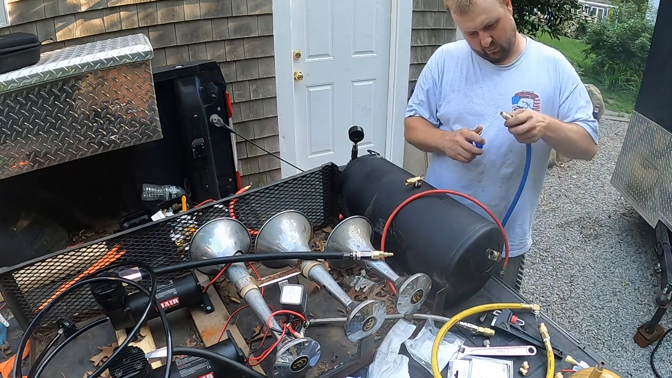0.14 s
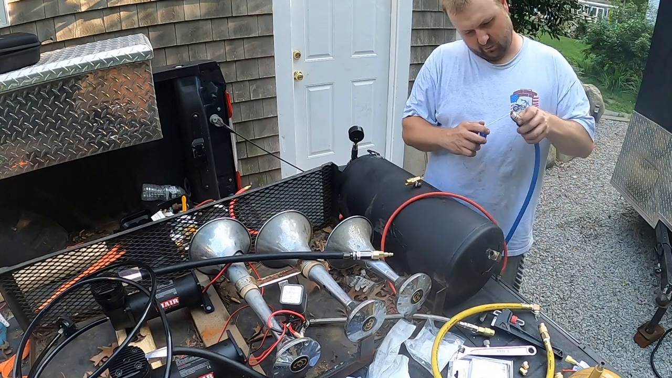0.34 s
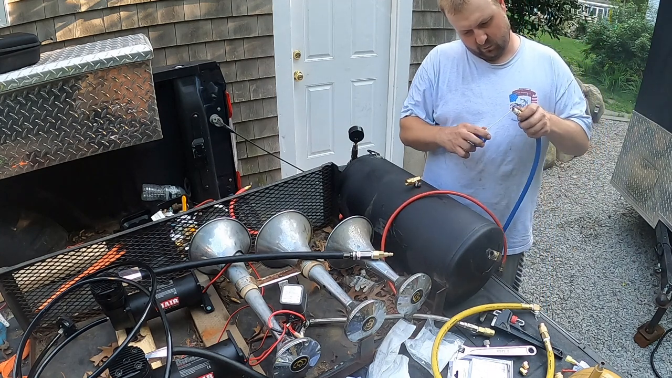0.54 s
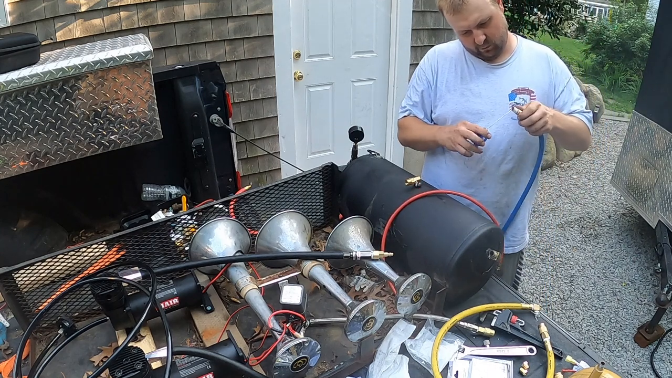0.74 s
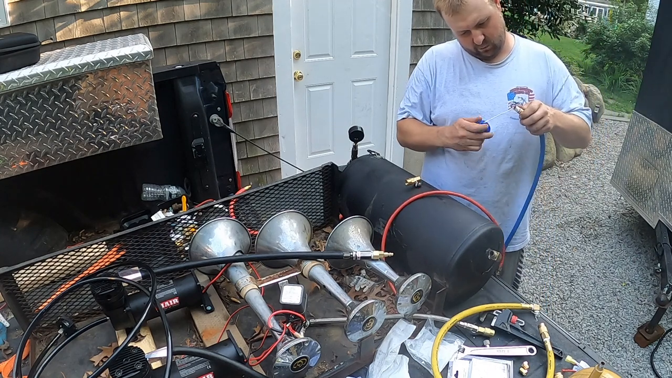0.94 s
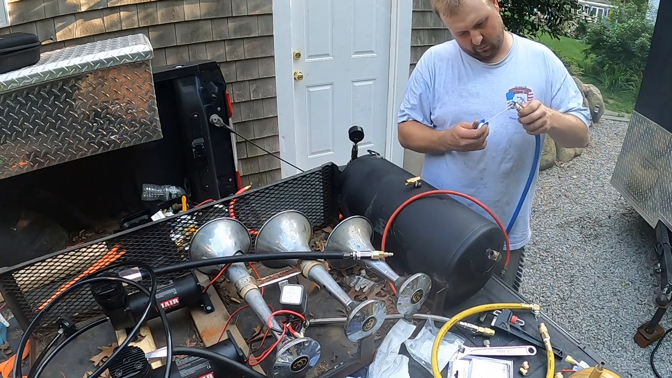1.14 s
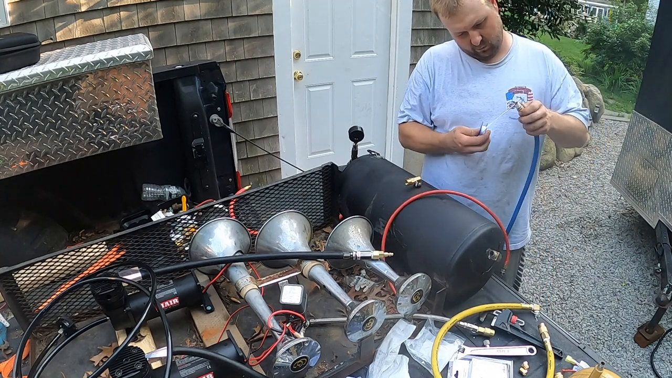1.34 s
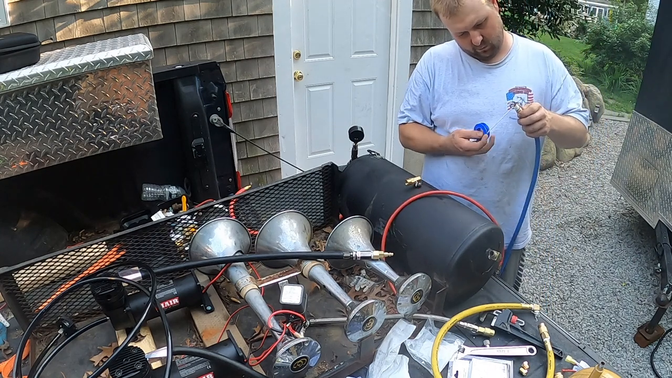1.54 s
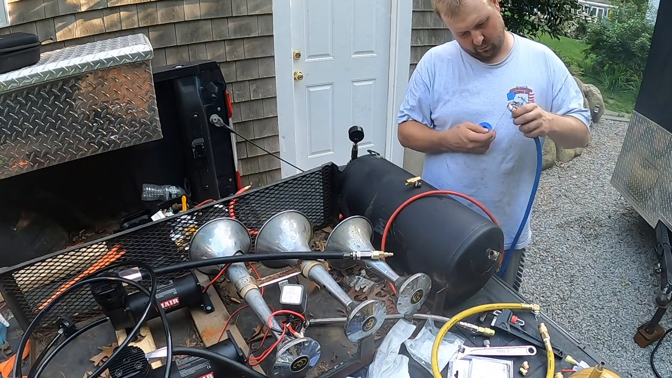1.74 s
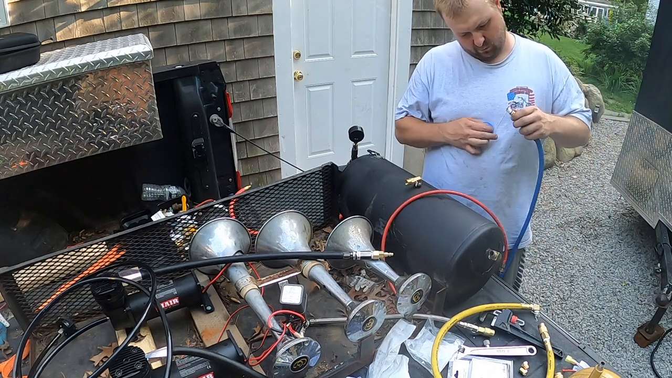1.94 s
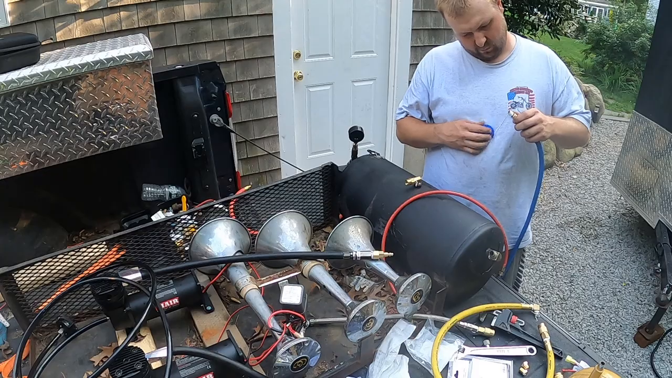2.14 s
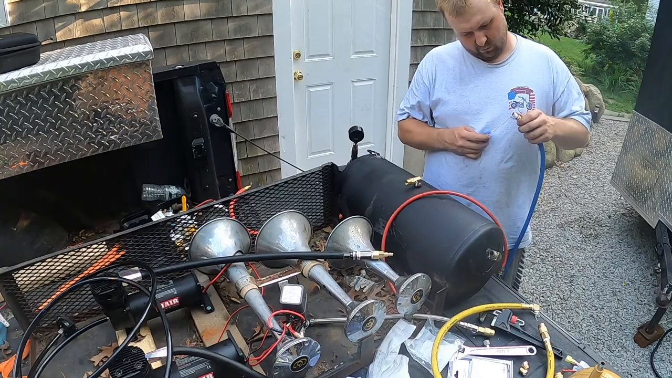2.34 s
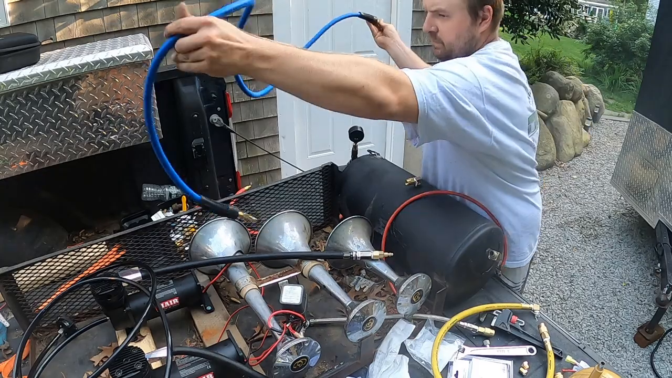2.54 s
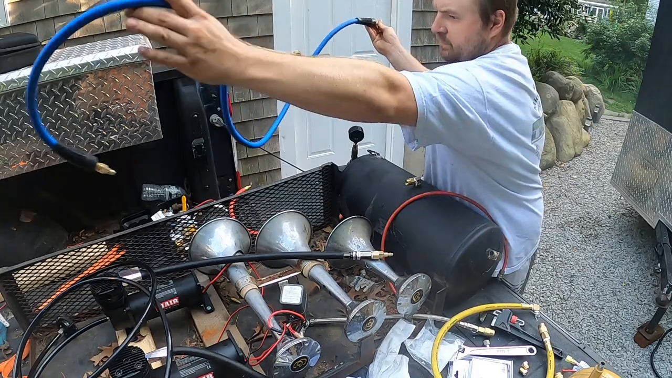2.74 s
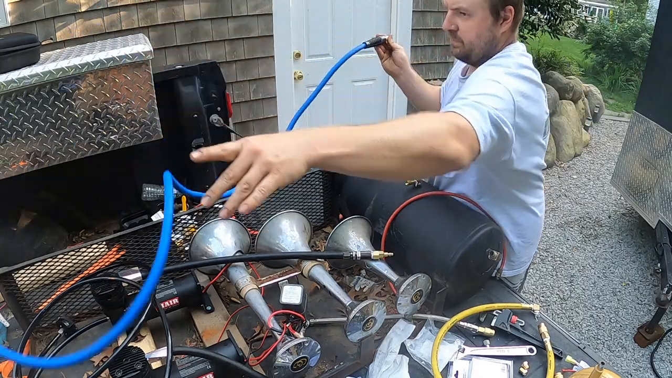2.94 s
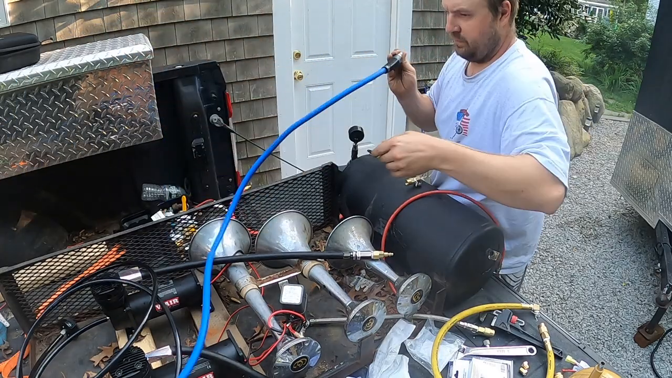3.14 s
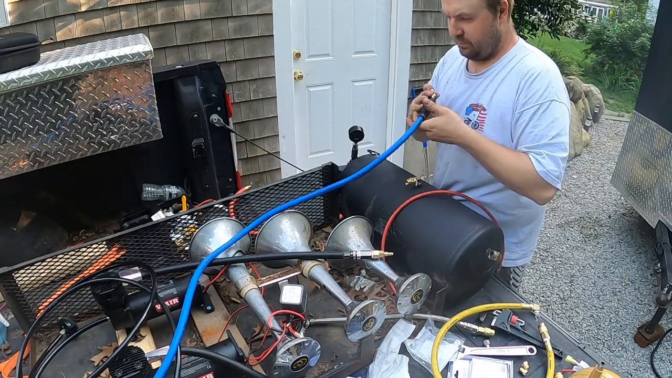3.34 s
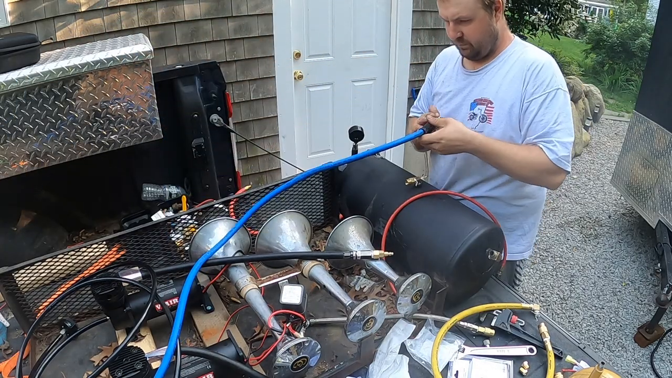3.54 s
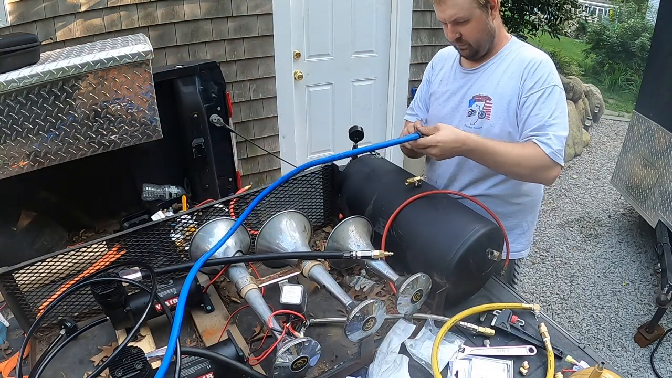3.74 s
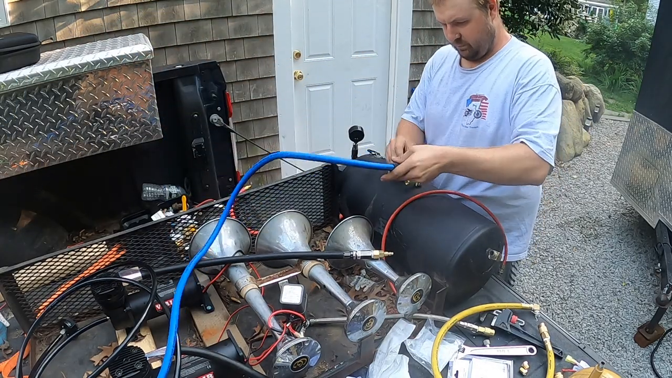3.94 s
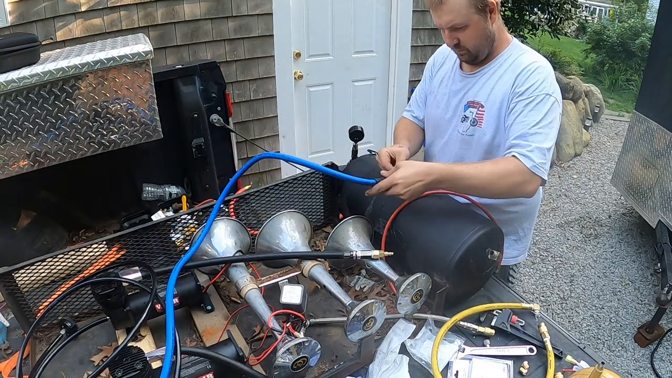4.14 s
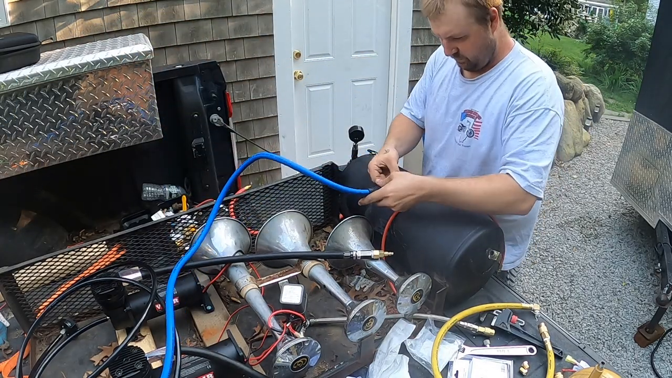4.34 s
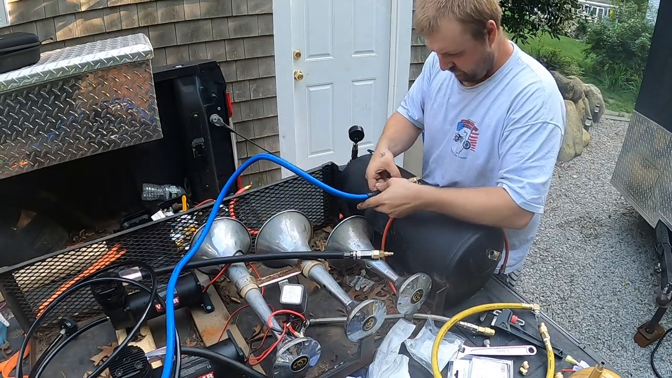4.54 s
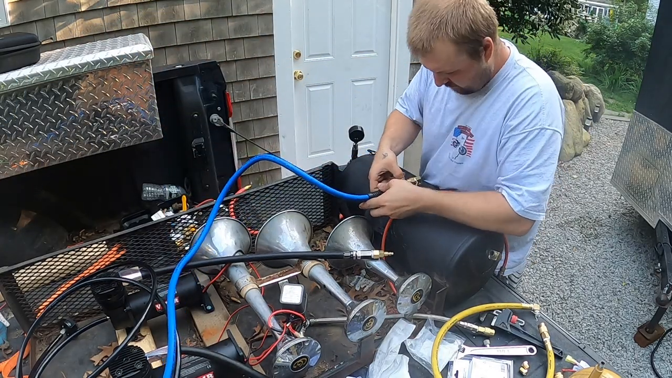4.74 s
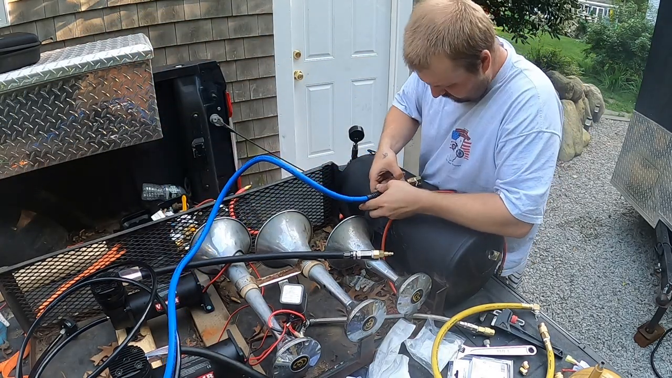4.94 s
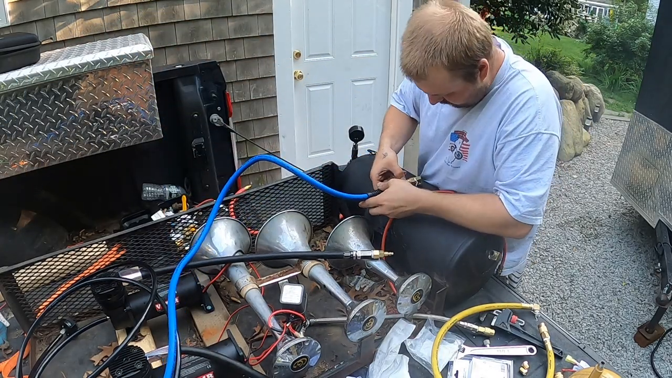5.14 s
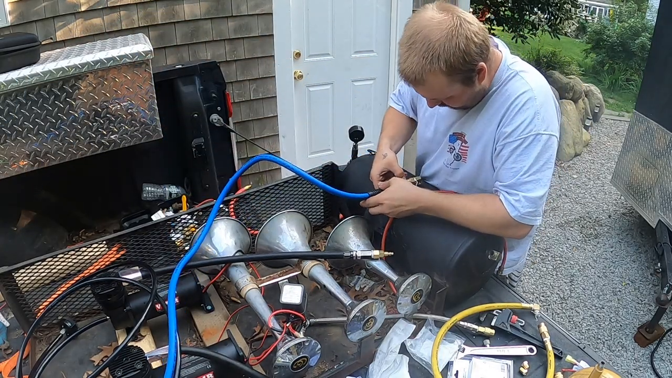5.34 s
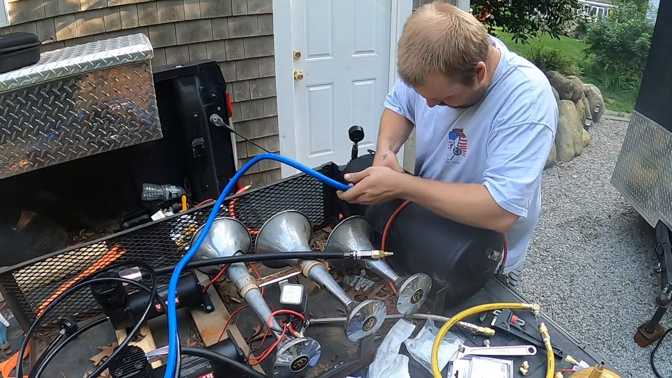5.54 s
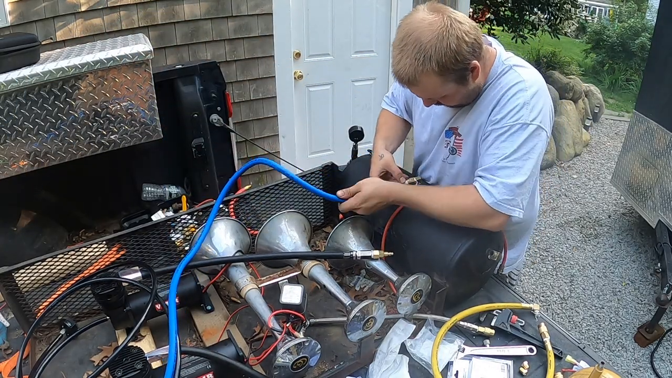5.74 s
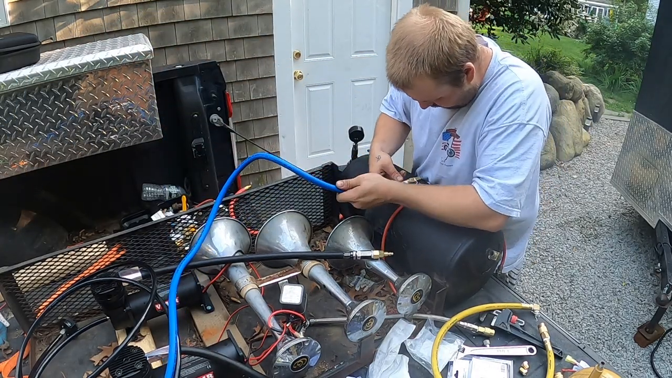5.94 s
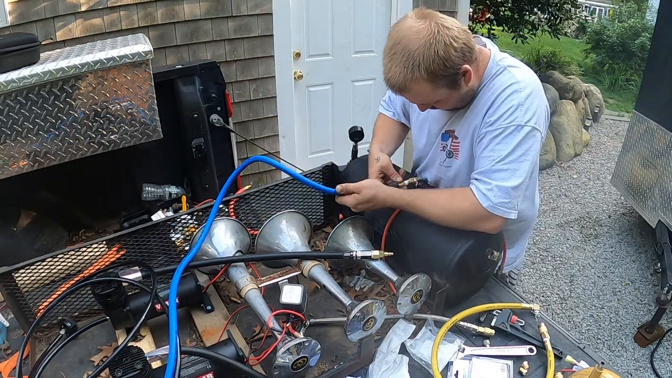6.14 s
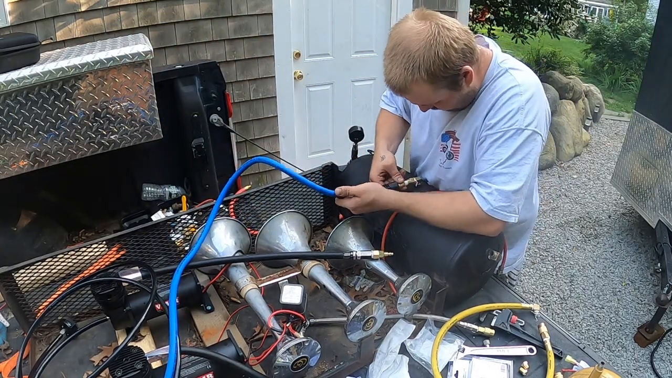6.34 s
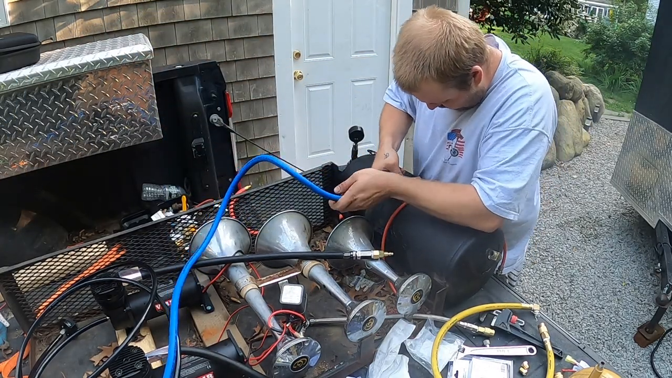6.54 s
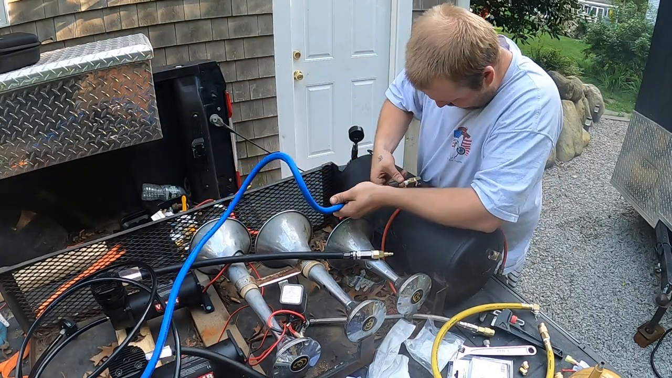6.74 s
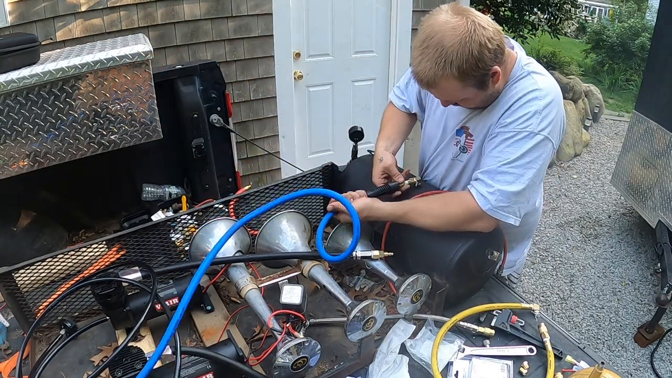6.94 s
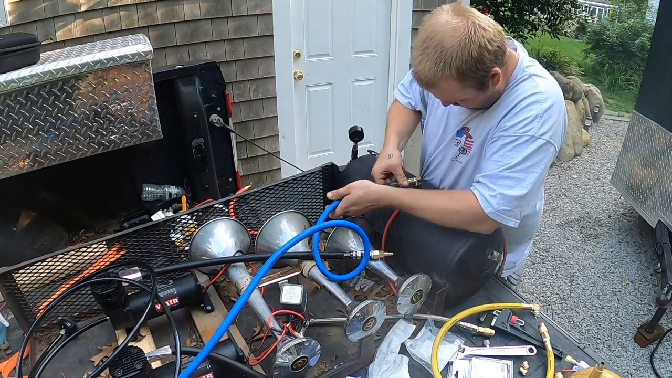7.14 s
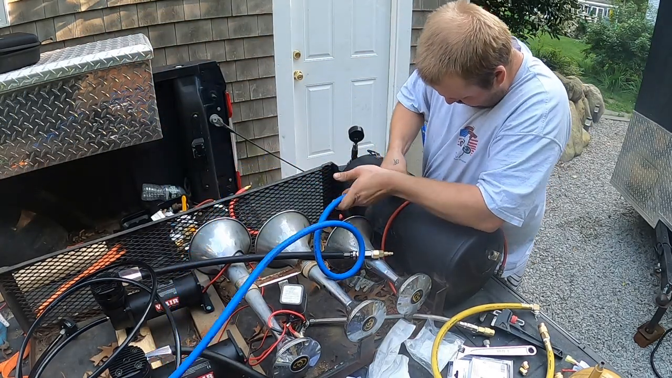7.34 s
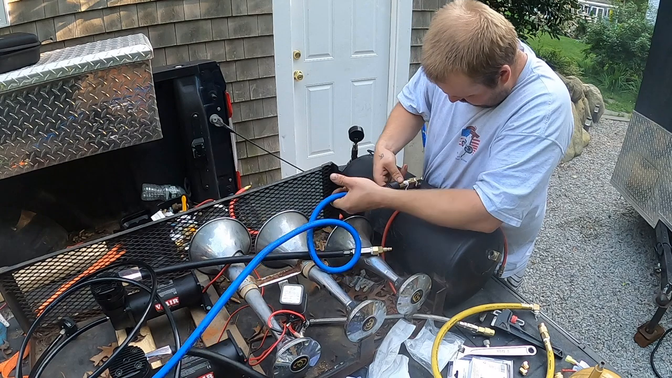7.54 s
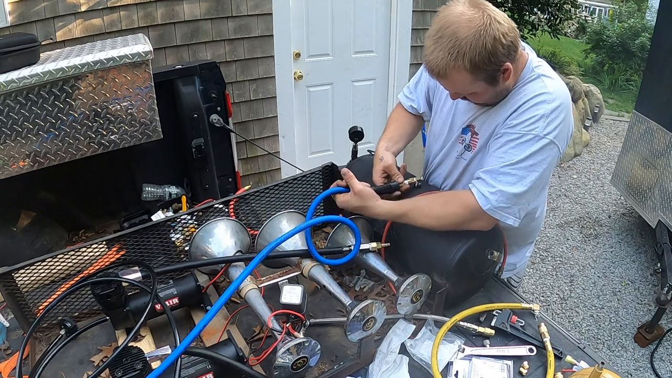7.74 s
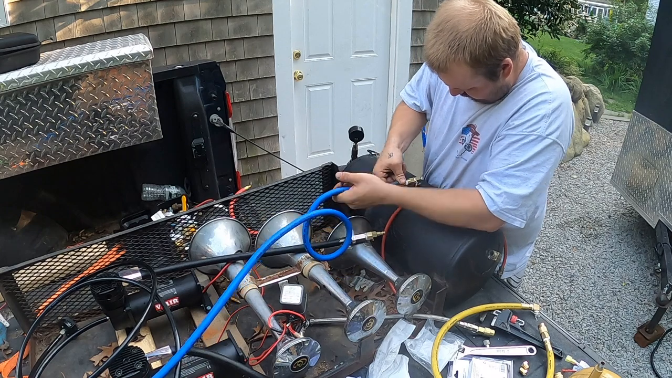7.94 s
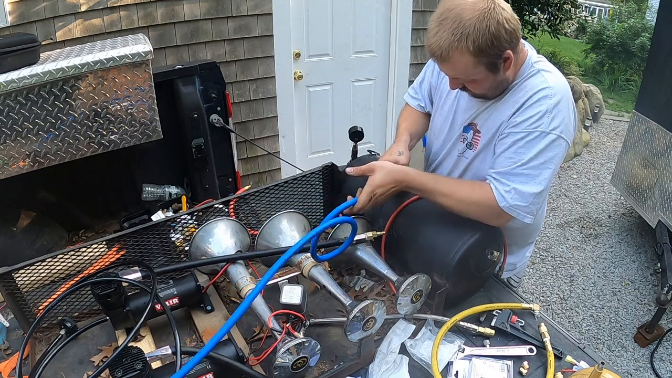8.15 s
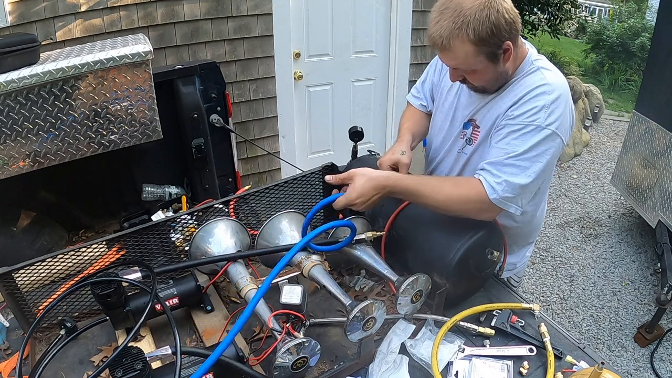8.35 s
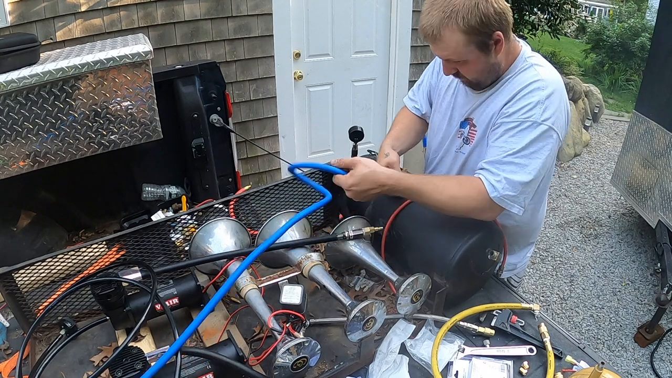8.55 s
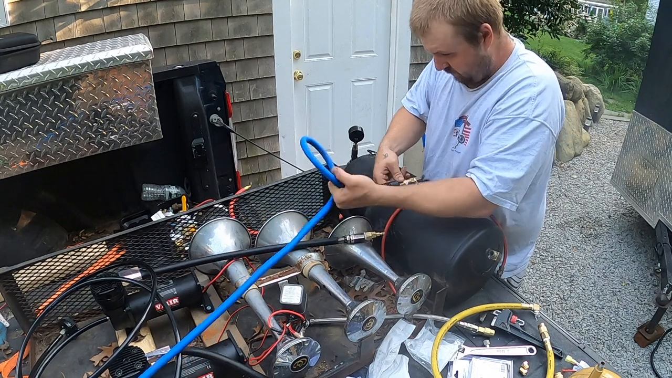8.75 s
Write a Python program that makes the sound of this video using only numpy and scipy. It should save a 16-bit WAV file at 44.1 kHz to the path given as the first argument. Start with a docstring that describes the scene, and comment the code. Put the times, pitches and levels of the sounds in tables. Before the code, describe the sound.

Sharp metal clicks, clanks and scrapes of an air hose being handled outdoors, with one loud thump and a fading low hum.

```python
"""In a yard, a hose with a brass coupler is handled over a trailer of steel horns, tools and an air tank.
Knocks make the metal ring, scrapes make the horns sing, and fingers brush the coupler.
The dropped hose end shakes the trailer and the microphone mount that rides on it.
Behind it are fading traffic, a breeze, insects, a far machine whine and two birds.
Two microphone openings, left and right, each hear the scene a little differently."""
import sys
import numpy as np
from scipy import signal
from scipy.fft import rfft, irfft
from scipy.io import wavfile
from scipy.ndimage import uniform_filter1d

SR = 44100
rng = np.random.default_rng(int(sys.argv[2]) if len(sys.argv) > 2 else 0)


def wav_out(sig):
    """Save sig, one row per channel (or a flat mono array), as 16-bit PCM at SR to the path in sys.argv[1]."""
    wavfile.write(sys.argv[1], SR, np.round(np.clip(np.atleast_2d(sig).T, -1, 1) * 32767).astype(np.int16))


N = 392490
T = np.arange(N) / SR
HZ = np.arange(N // 2 + 1) * SR / N + 1e-3
EDGE_DB = -1.5  # extra dip in the edge band, just below the treble

# Noise bands of a knock (thud, body, mid, edge, treble, top): low_hz, high_hz, fade_time_factor
CRACK_BANDS = [(150, 600, 1.5), (600, 1500, 1.2), (1500, 4200, 1), (4200, 6000, .85), (6000, 9500, .7),
               (9500, 14500, .6)]
# The bright bite of a knock: low_hz, high_hz, fade_time_factor
BITE_BAND = (2700, 4000, .8)
# How alike left and right are for background noise and rumble: pitch_hz, likeness (0 to 1)
FAR_LIKENESS = [(100, 0.93), (300, 0.66), (3500, 0.78), (5000, 0.98), (10000, 0)]


def gain(db):
    """Turn decibels into a multiplier."""
    return 10 ** (np.asarray(db, float) / 20)


def fade(t, fade_s):
    """Die away by 60 dB in fade_s seconds."""
    return np.exp(-np.log(1000) * t / fade_s)


def over_hz(table):
    """Read a (pitch_hz, value) table at every frequency."""
    hz, value = np.transpose(table)
    return np.interp(np.log(HZ), np.log(hz), value)


def over_time(table):
    """Read a (time_s, value) table at every sample."""
    return np.interp(T, *np.transpose(table))


def wander(rate_hz):
    """A smooth random wobble, roughly 1 in size."""
    hold = int(SR / rate_hz)
    steps = np.repeat(rng.standard_normal(N // hold + 1), hold)
    return 1.3 * uniform_filter1d(uniform_filter1d(steps, hold), hold)[:N]


def noise(colour, likeness):
    """Left and right noise; colour sets how strong each frequency is."""
    alike = np.clip(over_hz(likeness), 0, 1)
    shared, apart = rfft(rng.standard_normal((2, N))) * colour * np.sqrt([1 + alike, 1 - alike])
    pair = irfft([shared + apart, shared - apart], N)
    return pair / np.std(pair.mean(axis=0))


def noise_bands():
    """The noise that handling sounds are made of: six crack bands, the bite and a deep rubbing band."""
    # How alike left and right are up close: pitch_hz, likeness (0 to 1)
    likeness = [(40, 0.7), (300, 1), (3500, 1), (6000, 0), (9000, 0.05), (14000, 0.2)]
    return [noise(1 / np.sqrt((1 + (low_hz / HZ) ** 6) * (1 + (HZ / high_hz) ** 18)), likeness)
            for low_hz, high_hz, _ in CRACK_BANDS + [BITE_BAND, (83.3, 660, 1)]]


def ring(tones, t, scatter_db):
    """Struck metal rings with several fading tones, in a slightly different mix at each blow."""
    hz, db, fade_s = np.transpose(tones)[:, :, None]
    strength, phase = rng.standard_normal((2, len(tones), 1))
    level = gain(db + scatter_db * strength) * fade(t, np.clip(fade_s, .02, 1.2))
    return np.sum(level * np.sin(2 * np.pi * hz * t + 10 * phase), axis=0)


def echo(sound, level_db, fade_s, dull_above_hz):
    """Many small echoes blur into a short tail, different on the left and right."""
    tail = rng.standard_normal((2, N)) * fade(T, fade_s) * (T > .006)
    tail /= np.sqrt(np.sum(tail ** 2, axis=1, keepdims=True))
    return irfft(rfft(sound) * rfft(tail) / (1 + 1j * HZ / dull_above_hz), N) * gain(level_db)


def traffic():
    """Far traffic is a low, uneven roar that fades back."""
    # Tone of the roar: pitch_hz, level_db
    colour = [(21, -50), (35, -11.5), (71, 1.5), (89, 1), (108, -4.5), (135, -6), (155, -4), (178, -13.5),
              (254, -22.5), (362, -30.5), (414, -29.5), (447, -37.5), (500, -45), (650, -56), (1100, -120)]
    # Level of the roar: time_s, level_db
    levels = [(0, -33), (.12, -45), (.35, -46), (1.9, -45), (2.3, -49), (2.8, -57.5), (4.3, -57.5),
              (5.2, -56.5), (6.3, -54), (8.9, -52)]
    return gain(over_time(levels) + 2.8 * wander(9)) * noise(gain(over_hz(colour)), FAR_LIKENESS)


def breeze():
    """Moving air makes a soft rush that rises and falls."""
    # Tone of the rush: pitch_hz, level_db
    colour = [(120, -37.5), (200, 1.5), (363, -3.5), (443, -0.5), (624, -6), (880, -3), (946, -0.5),
              (1750, -7), (1980, -7), (2420, -12), (5170, -10.5), (6190, -25.5), (8410, -29.5), (9050, -34),
              (15000, -49.5)]
    # Level of the rush: time_s, level_db
    levels = [(0, -65.5), (2.2, -65.5), (2.95, -59), (3.35, -55), (3.9, -66.5), (4.7, -61.5), (5.8, -60),
              (7.3, -55), (8.9, -54)]
    return gain(over_time(levels) + .55 * wander(7.2)) * noise(gain(over_hz(colour)), FAR_LIKENESS)


def insects():
    """Insects blend into one high hiss."""
    # Tone of the hiss: pitch_hz, level_db
    colour = [(2240, -31), (3800, -8), (4250, -10.5), (4810, 1.5), (5150, 2.5), (5460, -0.5), (5910, -25),
              (6500, -16), (8450, -42.5), (14300, -120)]
    # Level of the high hiss, which dips near 3.4 s and 7.9 s and slowly comes back: time_s, level_db
    levels = [(0, -63.5), (2.5, -62.5), (3.0, -66), (3.4, -79), (4.2, -67), (5.6, -64), (7.6, -67.5),
              (7.9, -75), (8.2, -71), (8.9, -68)]
    return gain(over_time(levels)) * noise(gain(over_hz(colour)), FAR_LIKENESS)


def machine_whine():
    """Three thin tones from a far machine swell and waver on the air."""
    # The machine's tones: pitch_hz
    pitches = [969, 1938, 1104]
    # Swells, one list for each tone: peak_s, rise_db
    swell_lists = [
        [(.35, 9), (.85, 6), (1.4, 12), (1.7, 16.5), (4.5, 7), (4.82, 14), (7.6, 17)],
        [(.35, -1), (.73, 6), (.9, 3), (1.07, 4.5), (1.5, 1), (1.78, 4), (3.85, 1.5), (4.25, 8), (5.38, 8),
         (5.58, 4), (5.8, 3), (5.96, 8), (7.37, 12)],
        [(1.35, 8), (2.15, 11), (2.35, 8.5), (2.62, 20), (5.9, 12), (6.15, 18), (8.35, 17)],
    ]
    resting_db, swell_s = [-76, -72.5, -78], .11
    out = 0
    for hz, db, swells in zip(pitches, resting_db, swell_lists):
        swell_db = sum(rise_db * np.exp(-((T - peak_s) / swell_s) ** 2) for peak_s, rise_db in swells)
        level = gain(db + swell_db + 2.9 * wander(11))
        pitch_hz = hz * (1 + .00108 * wander(30))
        out += level * np.sin(2 * np.pi * np.cumsum(pitch_hz) / SR)
    return out


def birds():
    """One bird chirps in husky slides, another whistles thinly, and both echo among the trees."""
    # Sliding chirps: start_s, length_s, from_hz, to_hz, level_db
    chirps = [(.19, .04, 4100, 3300, -66), (.3, .04, 4200, 3400, -64), (.41, .04, 4100, 3300, -64),
              (.52, .05, 4100, 3300, -66), (1.18, .06, 2900, 3800, -68), (1.45, .07, 2900, 3900, -66),
              (1.77, .05, 4100, 3300, -66), (1.89, .05, 4100, 3200, -66), (2.0, .05, 4100, 3200, -67),
              (2.742, .035, 2850, 3900, -56), (2.838, .04, 2750, 3900, -54), (2.935, .045, 2750, 4100, -54),
              (3.035, .047, 2750, 4100, -54)]
    # High whistles, one list of points for each: time_s, pitch_hz, level_db
    whistles = [
        [(1.55, 7540, -81), (1.636, 8000, -74), (1.69, 8170, -74), (1.712, 8026, -92), (1.722, 8230, -77),
         (1.8, 7904, -85)],
        [(4.38, 8268, -102), (4.418, 8600, -78), (4.478, 8440, -77), (4.57, 8220, -73), (4.582, 8000, -102),
         (4.592, 8400, -79), (4.75, 8307, -100)],
    ]
    out, huskiness = np.zeros(N), 1 + .012 * wander(500)
    for start_s, length_s, from_hz, to_hz, db in chirps:
        progress = np.arange(int(length_s * SR)) / (length_s * SR)
        span = slice(int(start_s * SR), int(start_s * SR) + len(progress))
        pitch_hz = (from_hz + (to_hz - from_hz) * progress ** 1.2) * huskiness[span]
        level = gain(db) * np.sin(np.pi * progress) ** .6
        out[span] += level * np.sin(2 * np.pi * np.cumsum(pitch_hz) / SR)
    for whistle in whistles:
        time_s, hz, db = np.transpose(whistle)
        pitch_hz = np.interp(T, time_s, hz) * (1 + .005 * wander(150))
        level = np.sqrt(2) * gain(np.interp(T, time_s, db, left=-200, right=-200))
        out += level * np.sin(2 * np.pi * np.cumsum(pitch_hz) / SR)
    return out + echo(out, level_db=-6, fade_s=.25, dull_above_hz=9000)


def mount_shake():
    """The microphone mount sways, and hums after the hose end drops; both are louder on the right."""
    # Strength of the sway: time_s, level_db
    sway_levels = [(0.0, -42), (0.3, -64), (0.42, -55), (2.75, -53), (3.25, -49), (3.3, -38), (3.52, -56.5),
                   (3.57, -33.5), (5.35, -54), (5.57, -36.5), (5.7, -48), (6.52, -37.5), (6.89, -49.5),
                   (6.96, -38.5), (7.26, -45.5), (7.71, -32), (8.01, -40), (8.9, -43)]
    drop_s, hum_hz, hum_db = 3.298, 80.8, -8
    sway_hz, sway_width_hz = 28.6, 12.4
    t = np.clip(T - drop_s, 0, None)
    hum = gain(hum_db) * (1 - np.exp(-t / .0028)) * fade(t, fade_s=1.81) * np.sin(2 * np.pi * hum_hz * t)
    sway = noise(1 / (1 + ((HZ - sway_hz) / sway_width_hz) ** 2), likeness=[(20, .17), (40, .34)])
    sway *= gain(over_time(sway_levels))
    return hum * gain([[-20], [0]]) + sway * gain([[-7], [0]])


def trailer_rumble():
    """The trailer frame answers each jolt with a low, dying shudder."""
    # Jolts to the frame: start_s, level_db, fade_s
    jolts = [(3.294, -19.5, 0.67), (4.2, -33, 0.45), (6.809, -32.5, 0.62), (7.18, -33.5, 1),
             (7.92, -35, 0.99), (8.56, -29.5, .6), (8.67, -30, 1)]
    # Tone of the shudder: pitch_hz, level_db
    colour = [(30, -11.5), (70, -0.5), (150, -7.5), (250, -19.5), (420, -26.5), (650, -67.5), (1100, -110)]
    shake, rise_s = 0, .018
    for start_s, db, fade_s in jolts:
        t = np.clip(T - start_s, 0, None)
        shake += gain(db) * fade(t, fade_s) * (1 - np.exp(-t / rise_s))
    return shake * noise(gain(over_hz(colour)), FAR_LIKENESS)


def finger_rustles(bands):
    """Fingers brush the coupler in short, soft, high swishes."""
    # Brushes: start_s, level_db, mid_boost_db, length_s
    brushes = [(0.038, -71, -10, 0.029), (0.197, -73, -2, 0.024), (0.412, -71, 4, 0.041),
               (0.602, -78, 0, 0.022), (0.908, -70, -8, 0.026), (0.966, -70.5, 15, 0.027),
               (1.025, -69, -14, 0.029), (1.094, -66, -1, 0.053), (1.348, -61, 11, 0.041),
               (1.537, -71, 6, 0.039), (1.6, -73, -7, 0.026), (1.79, -72.5, 18, 0.054),
               (1.991, -71.5, 23.5, 0.049), (2.07, -72, 17, 0.049)]
    mid, edge, treble = bands[2:5]
    out = 0
    for start_s, db, mid_db, length_s in brushes:
        swell = gain(db - 7.5) * np.exp(-((T - start_s - length_s / 2) / (length_s / 2)) ** 2)
        out += swell * (treble + gain(11) * edge + gain(mid_db - 5.5) * mid)
    return out


def singing_horns(push, tones):
    """Rubbing noise stirs the horns' own tones, which ring on after it."""
    response = sum(gain(db) / (1 + 2j * (HZ - hz) / width_hz) for hz, width_hz, db in tones)
    response /= np.sqrt(np.mean(np.abs(response) ** 2))
    return irfft(rfft(push * rng.standard_normal(N)) * response, N)


def scrapes(bands):
    """Hose and hands stick and slip over the load, making grainy noise that sets the horns singing."""
    # Strokes: peak_s, level_db, rise_s, fall_s, thud_db, treble_db, low_horns_db, high_horns_db
    # Rise and fall each cover 20 dB; the last four columns are added to level_db.
    strokes = [(.02, -75.5, 0.09, 0.053, 27.5, -9, -3, -13),
               (2.36, -49.5, 0.059, 0.093, -25, -20.5, -16, -8),
               (2.435, -59.5, 0.013, 0.037, 3, -28, -1.5, -5.5),
               (2.856, -54, .03, 0.033, -21, -38, -15, -7), (2.954, -65, .07, 0.14, -12, -14, -1, 0.5),
               (3.06, -69, .1, 0.22, -14, -25.5, -6, 6),
               (3.175, -40.5, 0.015, 0.071, 11.5, -20.5, 4.5, -12),
               (3.245, -37, 0.036, .08, 11.5, -31, -2.5, -10),
               (5.238, -36, 0.011, 0.037, -19, -60, -3.5, -31), (5.295, -59, .04, 0.026, -3, -46, 0, -18),
               (5.57, -59.5, 0.062, 0.1, 3, -16, -7.5, -2), (6.78, -62.5, .05, 0.12, 2, -12, -4, 2),
               (6.864, -38.5, 0.03, 0.014, -11, -16, -14.5, -7),
               (7.314, -51.5, 0.038, 0.035, 8.5, -19, -5.5, -9),
               (7.46, -61.5, 0.15, 0.035, 12.5, -33, -4, -5), (7.55, -60, .1, .1, -14, -40, -1, -16),
               (7.61, -49.5, 0.03, 0.25, -13, -30, -1, -8.5), (7.68, -48.5, 0.13, 0.056, -4, -47, -6, -5),
               (7.84, -53.5, 0.16, 0.12, -14, -18, 0, -7.5), (7.905, -38, .035, 0.04, -19.5, -29, 7, 5),
               (7.972, -41.5, 0.032, 0.097, -3.5, -13, 2.5, 13.5),
               (8.06, -59, 0.25, 0.15, -13, -36, 6.5, 0.5), (8.34, -67.5, 0.091, 0.092, 6, -7, -2, -2),
               (8.535, -38, 0.055, 0.043, -9.5, -13.5, -2, 6), (8.665, -49.5, .04, 0.21, 4, -15, -1.5, 3),
               (8.755, -48, 0.16, 0.085, -7.5, -15, 2, 6)]
    # Lower tones of the horns: pitch_hz, width_hz, level_db
    low_horns = [(388, 20, -12), (1695, 14, -12), (1815, 16, -6), (2230, 16, -13), (2600, 14, -8),
                 (2670, 16, -2), (2830, 16, -6), (3060, 18, -4)]
    # Higher tones of the horns: pitch_hz, width_hz, level_db
    high_horns = [(3815, 18, 2), (3900, 30, -7), (4110, 20, -12), (4390, 25, -11), (4590, 30, -16),
                  (4945, 25, -14), (5265, 25, -14), (6040, 30, -13), (6780, 25, -17), (7130, 30, -19),
                  (7630, 30, -21), (8310, 30, -22), (9020, 35, -24), (10400, 60, -30), (11500, 60, -31)]
    _, body, mid, edge, treble, top, _, thud = bands
    grain = gain(2.95 * wander(45) + 2 * wander(400))
    pushes = np.zeros((6, N))
    for peak_s, db, rise_s, fall_s, thud_db, treble_db, low_db, high_db in strokes:
        stroke = gain(db - 20 * np.maximum((peak_s - T) / rise_s, (T - peak_s) / fall_s))
        pushes += stroke * gain([0, thud_db, treble_db / 2 + EDGE_DB, treble_db, low_db, high_db])[:, None]
    force, thud_push, edge_push, treble_push, low_push, high_push = pushes
    friction = force * (gain(-13.5) * body + gain(-7.5) * mid)
    friction += edge_push * edge + treble_push * (treble + gain(-6.5) * top)
    horns = singing_horns(grain * low_push, low_horns) + singing_horns(grain * high_push, high_horns)
    return grain * friction + thud_push * thud + horns


def coupler_clinks():
    """The loose brass coupler rings freely when it is hit."""
    # Tones of the brass: pitch_hz, level_db, fade_s
    brass = [(1900, 2, .1), (2315, -10, .25), (2816, -4, .5), (2827, -4, .5), (3015, -8, .25),
             (3101, -4, .22), (3289, -6, .55), (3580, 0, .65), (3774, -8, .3), (3876, -13, .3),
             (5060, -10, .2), (5739, -12, .13), (6148, -18, .25), (7052, -19, .2), (8473, -24, .25)]
    # Blows on the coupler: start_s, level_db
    blows = [(2.4545, -32.5), (3.161, -56), (7.172, -48)]
    out, t = np.zeros(N), T[:int(.6 * SR)]
    onset = (1 - np.exp(-t / .0003)) ** 2
    for start_s, db in blows:
        start = int(start_s * SR)
        out[start:start + len(t)] += gain(db) * onset * ring(brass, t, scatter_db=1)
    return out


def knocks(bands):
    """Each blow makes a crack whose treble dies first, a three-tone clack, and rings tank and trailer."""
    # Blows: start_s, level_db, thud_db, body_db, treble_db, fade_s, hollow_hz, low_clack_hz,
    # high_clack_hz, hollow_db, low_clack_db. The later dB columns are added to level_db.
    blows = [(2.454, -13.5, -21, -16.5, -24, .15, 1260, 1848, 3160, -27, -4),
             (2.9087, -50, -23, 8, -30, 0.36, 1065, 1460, 3030, -1, -4),
             (3.1486, -17.5, -13, -9, -10.5, 0.082, 1340, 2740, 3670, -16, -8),
             (3.1612, -12, -20, -7, -9.5, 0.057, 1070, 1560, 3490, -10, -7.5),
             (3.1765, -15.5, -20, 3, -25.5, 0.1, 1390, 1730, 2696, -15.5, -1),
             (3.2035, -26.5, 5.5, 7, -7, 0.094, 638, 1843, 3350, 1, -0.5),
             (3.2425, -27, -2, 1.5, -12, 0.096, 650, 1930, 3290, -13.5, 0),
             (3.277, -32, -14, 13.5, -8, 0.055, 205, 1500, 3530, -11.5, -8.5),
             (3.2936, -12.5, 9.5, 12.5, -72, 0.072, 793, 1866, 2476, -7.5, 1),
             (3.4024, -45.5, 19.5, 13, -18, 0.25, 278, 1990, 2620, -11, -6),
             (3.479, -36, -5, -4.5, -23, 0.084, 203.7, 1850, 3430, -13.5, -1.5),
             (4.156, -25.5, -7.5, -12, -25, .15, 240, 1656, 3106, -9.5, -5.5),
             (4.8579, -14.5, -35, -26.5, -37.5, 0.093, 1284, 2330, 3770, -26.5, -21.5),
             (4.8657, -26.5, -25, -30, -39, 0.23, 1270, 1620, 3250, -20, -14),
             (5.255, -31.5, -11, -9, -61, 0.14, 655, 1637, 3290, -5, -1.5),
             (5.3131, -32.5, -15, -7, -58, 0.095, 1324, 1660, 3400, -3.5, -10),
             (5.5336, -47.5, -17.5, 4.5, -37, 0.13, 1180, 1580, 3730, -7, -5),
             (5.767, -48, -5, -3, -26, 0.16, 1300, 1620, 3310, -12, -15),
             (6.0099, -18, -25, -8.5, -48, 0.11, 647.5, 1630, 3220, -10, -12.5),
             (6.3693, -48.5, -13, -21, -42, .12, 366, 1780, 2730, -11, -3.5),
             (6.774, -45, -12, -4, -19, 0.13, 202, 1940, 3570, -17, -15),
             (6.8077, -41, 9.5, 2, -20, 0.18, 261, 1650, 3630, -5, -17),
             (7.1213, -34.5, -14, -25, -37, .069, 203, 1950, 3300, -13, -28),
             (7.1713, -16.5, -11.5, -10, -18.5, 0.1, 388, 1834, 3456, -19, -13),
             (7.313, -30, -8, -1.5, -22, 0.057, 252, 2160, 2860, -8, -21),
             (7.4445, -43, -12, 0, -26, 0.13, 664, 1676, 4000, 4.5, -2),
             (7.89, -38, 4, -13, -16, 0.057, 397, 1815, 2650, -29, -19),
             (7.966, -36.5, 3.5, -13, -10, 0.12, 370, 1706, 3830, -8, -17),
             (8.513, -44, -18, -12, -8, .06, 410, 2670, 3840, -26, -4),
             (8.659, -34, -5, -20, -23.5, 0.11, 220, 1830, 3980, 3, -10)]
    # Tones of the air tank: pitch_hz, level_db, fade_s
    tank = [(668, 0, .2), (1110, -10, .14), (1330, -5, .18), (1650, -7, .18), (1803, -12, .2),
            (2073, -5, .11), (2440, -14, .2), (2678, -14, .2), (2830, -12, .3), (3170, -11, .25),
            (3666, -16, .2)]
    # Tones of the trailer: pitch_hz, level_db, fade_s
    trailer = [(247.8, -6, 0.43), (345, -18.5, 1), (392, 1.5, 0.27), (436, -9, 0.83), (610, -26, 0.77),
               (1005, -18.5, 1), (960, -13, 0.26), (1105, -16.5, 0.35), (1200, -31.5, 0.57),
               (1200, -30.5, 0.7)]
    crack_db, bite_db, high_clack_db, tank_db, trailer_db = -9, -3, -6.5, -31, -38
    out = np.zeros((2, N))
    for start_s, db, thud_db, body_db, treble_db, fade_s, *clack_hz, hollow_db, low_clack_db in blows:
        start = int(start_s * SR)
        span = slice(start, min(start + SR // 2, N))
        t = T[span] - T[start]
        level = gain(db) * (1 - np.exp(-t / .0003)) ** 2 * np.clip(20 - 40 * t, 0, 1)  # gone by 0.5 s
        mid_db, edge_db, top_db = .36 * low_clack_db, treble_db / 2 + EDGE_DB, 1.6 * treble_db
        band_levels = thud_db, body_db, mid_db, edge_db, treble_db, top_db, bite_db
        for band, band_db, (_, _, stretch) in zip(bands, band_levels, CRACK_BANDS + [BITE_BAND]):
            out[:, span] += level * gain(band_db + crack_db) * band[:, span] * fade(t, fade_s * stretch)
        clack_db = np.minimum([hollow_db, low_clack_db, high_clack_db], 1)
        clack = np.transpose([clack_hz, clack_db, fade_s * np.array([1.4, .7, .65])])
        for tones, part_db in ((tank, tank_db), (trailer, trailer_db), (clack, 0)):
            out[:, span] += level * gain(part_db) * ring(tones, t, scatter_db=1.5)
    return out


def microphone_openings(sound):
    """The two openings colour the sound in opposite ways, and the left one hears it later."""
    # Balance between the openings: pitch_hz, left_minus_right_db
    balance = [(100, -2.5), (500, 0), (1800, 1.5), (3200, 5.5), (4000, 3.5), (5000, -1), (6300, -5.5),
               (8000, -16.5), (10000, -3.5), (13000, -4.5)]
    left_delay_s = 6e-5
    tilt = gain(over_hz(balance) / 2)
    left = tilt * np.exp(-2j * np.pi * HZ * left_delay_s)
    response = np.array([left, 1 / tilt]) * 2 / (tilt + 1 / tilt)
    return irfft(rfft(sound) * response, N)


def scene():
    """Close handling echoes off the house wall and trailer sides, over the yard's background."""
    bands = noise_bands()
    handling = knocks(bands) + scrapes(bands) + finger_rustles(bands) + coupler_clinks()
    yard_echo = echo(handling.mean(axis=0), level_db=-12, fade_s=.45, dull_above_hz=3000)
    in_air = traffic() + breeze() + insects() + trailer_rumble() + birds() + machine_whine()
    return microphone_openings(in_air + handling + yard_echo) + mount_shake()


def record(dry):
    """The microphone's input rounds off the loudest peaks and cuts the highest treble."""
    ceiling, top_hz = 1.2, 15000
    rounded = ceiling * np.tanh(dry / ceiling)
    return signal.sosfilt(signal.ellip(8, .2, 70, top_hz, fs=SR, output="sos"), rounded)


dry = scene()
out = record(dry)
wav_out(out)
```